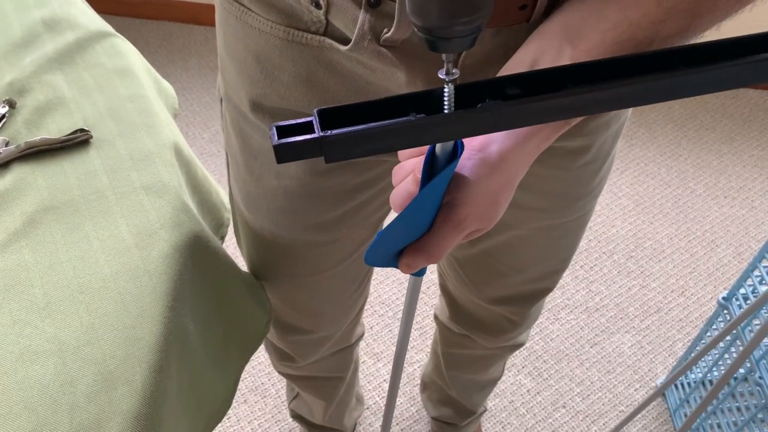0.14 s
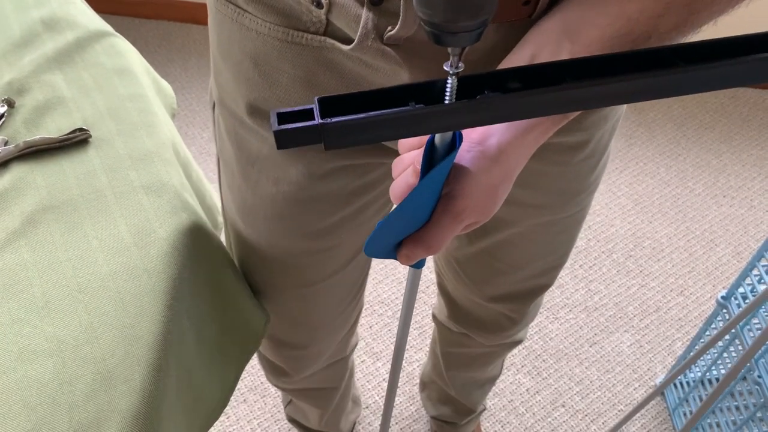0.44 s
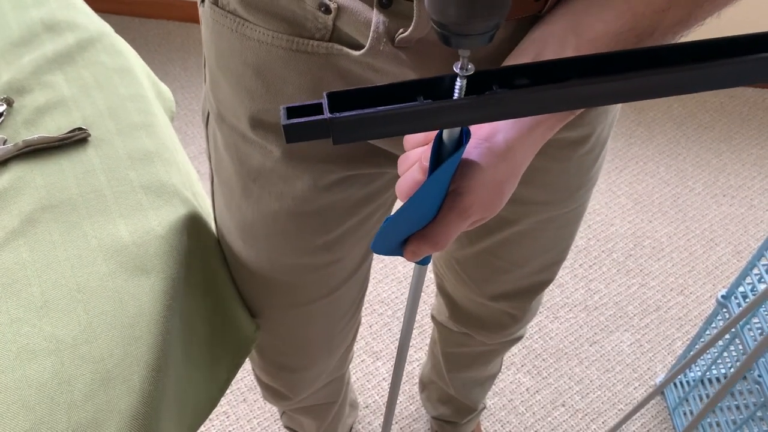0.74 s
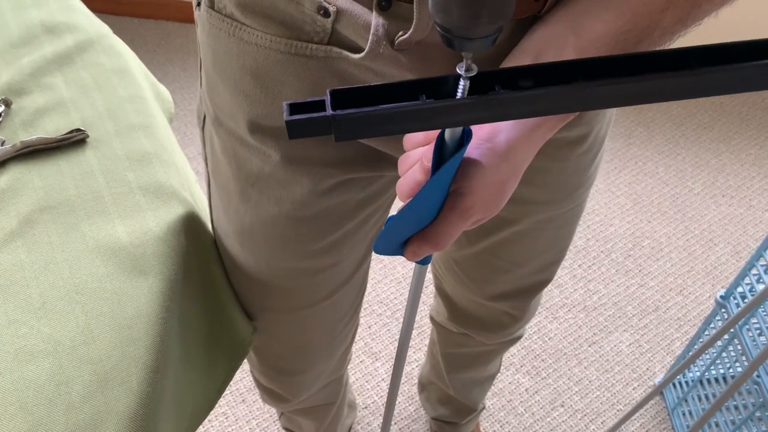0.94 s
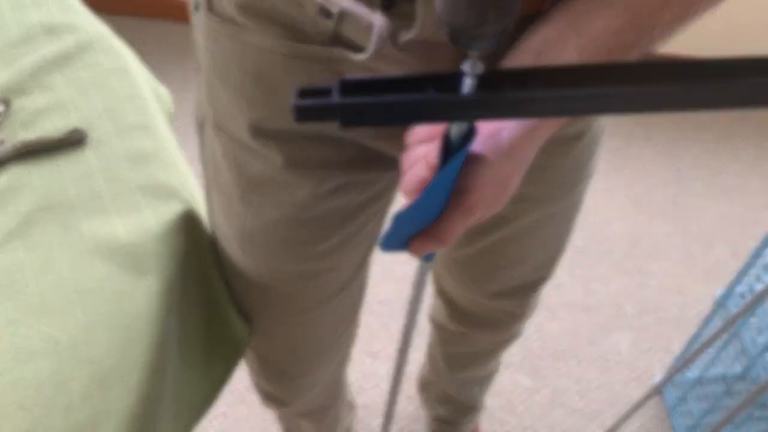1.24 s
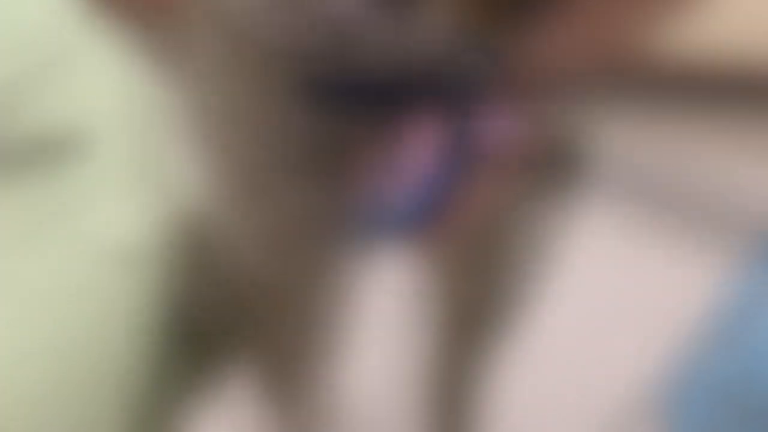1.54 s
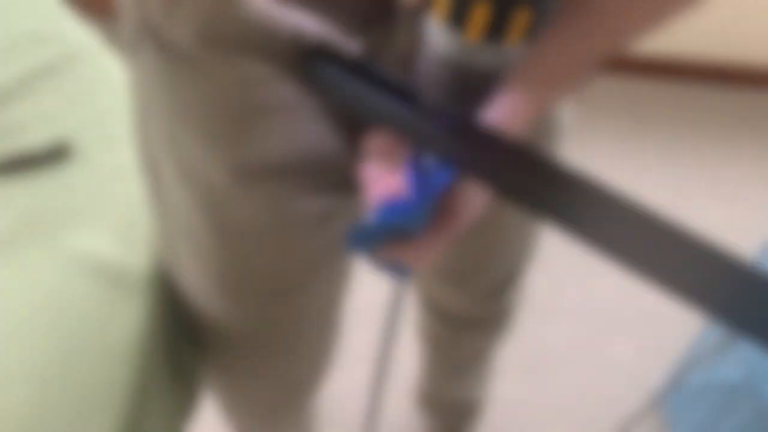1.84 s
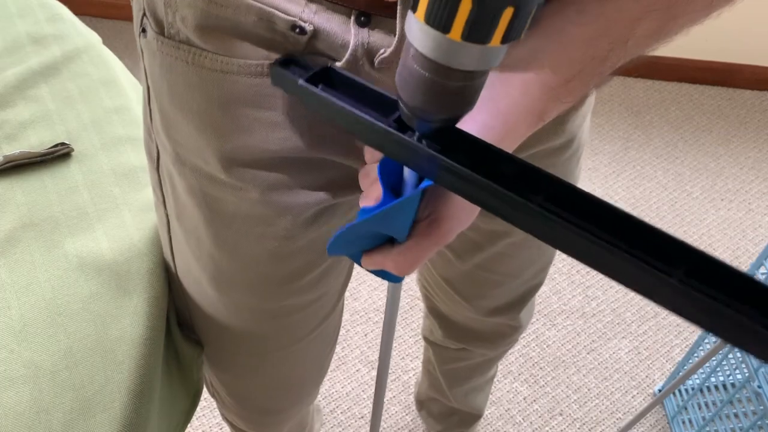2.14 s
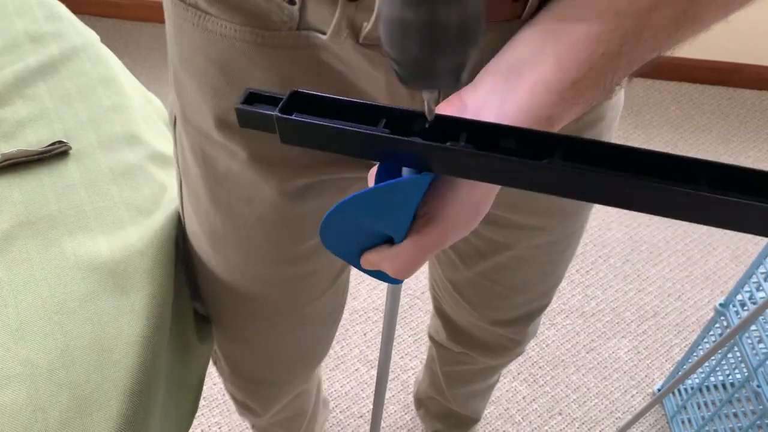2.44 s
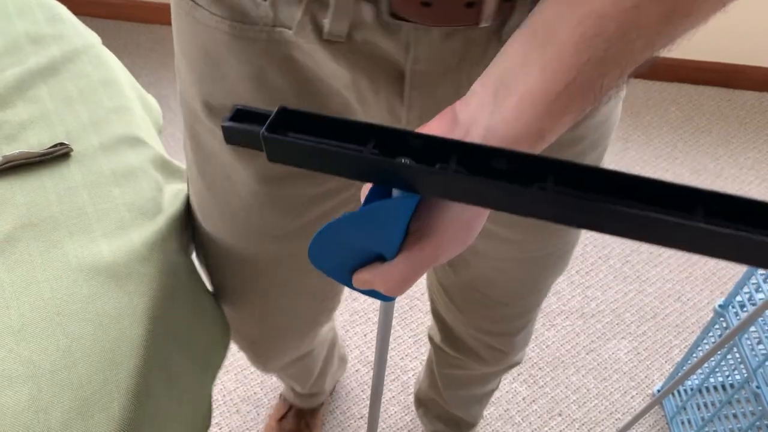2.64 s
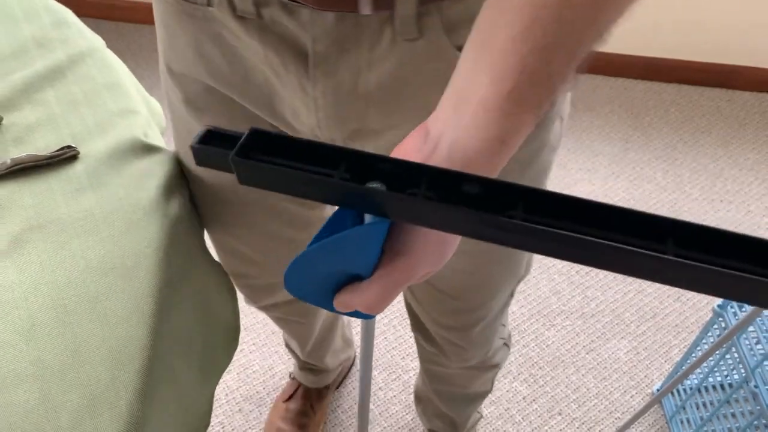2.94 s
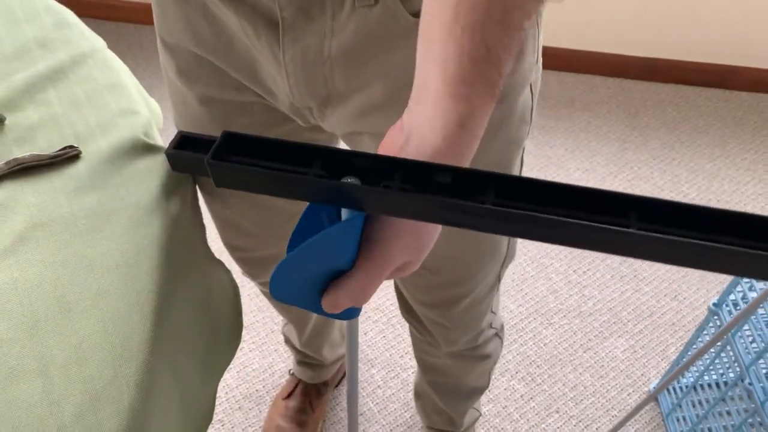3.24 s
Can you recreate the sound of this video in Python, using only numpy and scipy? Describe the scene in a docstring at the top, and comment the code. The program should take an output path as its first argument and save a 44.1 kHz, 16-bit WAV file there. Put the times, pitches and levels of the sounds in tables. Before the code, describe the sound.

A cordless drill whines and rattles, driving a screw into a metal rod, then stops.

```python
"""A cordless drill whines, rattles and revs up, driving a screw into an aluminium rod, close by in a
small carpeted room. Gear teeth and the grinding thread shake the resonances of drill and rod, harder
as the screw seats. The thread squeals, the work thumps and the bit slips twice. The drill stops with
a clack and ticks to rest; a sharp metal click and faint handling follow over a mains hum."""
import sys
import numpy as np
from scipy import signal
from scipy.fft import rfft, irfft
from scipy.io import wavfile
from scipy.ndimage import uniform_filter1d

SR = 44100
rng = np.random.default_rng(int(sys.argv[2]) if len(sys.argv) > 2 else 0)


def master_out(mix):
    """Clip the mix to full scale and print it as 16-bit PCM to the path in sys.argv[1]."""
    frames = np.transpose(np.atleast_2d(mix))
    ceiling = np.clip(frames, -1, 1)
    pcm = np.round(ceiling * 32767).astype(np.int16)
    wavfile.write(sys.argv[1], SR, pcm)


N = 149940
STOP_S = 2.045


def undb(db):
    """Decibels to gain."""
    return 10 ** (np.asarray(db) / 20)


def unit(x):
    """Scale to rms 1."""
    return x / np.sqrt(np.mean(x ** 2) + 1e-20)


def clock():
    """Sample times in seconds."""
    return np.arange(N) / SR


def curve(table, column=1):
    """One table column, interpolated over time."""
    rows = np.array(table)
    return np.interp(clock(), rows[:, 0], rows[:, column])


def smooth(x, window_s):
    """Running mean."""
    return uniform_filter1d(x, max(int(window_s * SR), 1))


def wander(rate_hz):
    """Smooth random drift, rms 1."""
    hold = max(int(SR / rate_hz), 1)
    steps = np.repeat(rng.standard_normal(N // 40)[:N // hold + 1], hold)
    return unit(uniform_filter1d(steps, hold)[:N])


def noise(spectrum):
    """Noise of rms 1, shaped by (freq_hz, level_db) points."""
    hz, db = np.array(spectrum, float).T
    bins_hz = np.maximum(np.fft.rfftfreq(N, 1 / SR), 1)
    gain = undb(np.interp(np.log(bins_hz), np.log(hz), db))
    return unit(irfft(rfft(rng.standard_normal(N)) * gain, N))


def decay(start_s, decay_s):
    """Jump to 1, then exponential fall."""
    age_s = clock() - start_s
    return (age_s >= 0) * np.exp(-np.maximum(age_s, 0) / decay_s)


def strikes(events, decay_s):
    """One decay per (start_s, level_db) row, summed."""
    return sum(undb(db) * decay(start_s, decay_s) for start_s, db in events)


def sine(hz):
    """Tone of rms 1, fixed or moving pitch, random phase."""
    return np.sqrt(2) * np.sin(2 * np.pi * (np.cumsum(hz * np.ones(N)) / SR + rng.random()))


def resonate(x, hz, width_hz):
    """Steep resonance: a band-pass applied twice, scaled to rms 1."""
    b, a = signal.iirpeak(hz, hz / (2 * width_hz), fs=SR)
    return unit(signal.lfilter(b, a, signal.lfilter(b, a, x)))


def db_at_load(load, levels_db):
    """Blend three levels by load: 0 turning lightly, 1 cutting, 2 seating."""
    return np.interp(load, [0, 1, 2], levels_db)


# freq_hz, width_hz, light_db, cutting_db, seating_db
BODY_MODES = [(620, 340, -24, -17.5, -14), (950, 130, -9, -11.5, -10.5), (1363, 226, -4.5, -2.5, -2),
              (1748, 250, -3.5, -6, -3), (2200, 500, -23, -13, -10.5), (2815, 280, -11, -6.5, -3),
              (3350, 490, -2, -2.5, -6), (4594, 670, -13.5, -13.5, -9), (5586, 400, -20, -10.5, -6),
              (6533, 465, -10, -6.5, -3), (7850, 432, -6.5, -5.5, -1.5), (10340, 1930, -22, -19, -12.5),
              (12520, 700, -15, -14, -11.5), (13850, 600, -18, -20, -19), (15100, 360, -16, -9.5, -7.5)]
def rattle(motor_hz, load):
    """Tooth strikes and thread grind shake drill and rod; load shifts the balance of the modes."""
    meshes_per_turn, scatter_db, grind_db, flutter_db = 8, 4, -0.5, 1.11
    turns = np.cumsum(motor_hz) / SR
    teeth = np.diff(np.floor(turns * meshes_per_turn), prepend=0)
    teeth *= undb(scatter_db * rng.standard_normal(N))
    out, power = 0, 0
    for hz, width_hz, *levels_db in BODY_MODES:
        impacts = unit(teeth * rng.standard_normal(N))
        grind = undb(grind_db) * rng.standard_normal(N)
        gain = undb(db_at_load(load, levels_db)) * np.sqrt(width_hz)
        out += gain * resonate(impacts + grind, hz, width_hz) * undb(flutter_db * wander(70))
        power += gain ** 2
    return out / np.sqrt(power)


# motor_multiple, light_db, cutting_db, seating_db (relative to the rattle)
GEAR_ORDERS = [(1, -47, -36, -45.5), (2, -31.5, -23.5, -28.5), (3, -22.5, -26, -30), (4, -19.5, -16, -23),
               (4.04, -27, -13.5, -18.5), (6.95, -25, -22, -14), (7, -27, -19, -34.5),
               (7.93, -22.5, -14.5, -21.5), (8, -10, -9, -17.5), (19, -34, -24.5, -28.5)]
def gear_whine(motor_hz, load):
    """Tones at multiples of the motor speed, roughened by play in the gears."""
    backlash_turns, flutter_db = 0.012, 2
    gear_hz = motor_hz + backlash_turns * SR * np.gradient(wander(350.4))
    return sum(sine(multiple * gear_hz) * undb(db_at_load(load, levels_db) + flutter_db * wander(35))
               for multiple, *levels_db in GEAR_ORDERS)


# freq_hz, width_hz, light_db, cutting_db, seating_db (relative to the rattle)
ROD_MODES = [(831.6, 30, -43, -30.5, -26), (1383, 60, -33, -19.5, -19.5), (5534, 40, -21, -18.5, -19),
             (6730, 60, -30, -19.5, -25), (7810, 90, -17, -15.5, -21), (8010, 53, -13, -31.5, -10.5)]
def rod_ring(load):
    """Grinding keeps the rod's sharp modes ringing."""
    return sum(resonate(rng.standard_normal(N), hz, width_hz) * undb(db_at_load(load, levels_db))
               for hz, width_hz, *levels_db in ROD_MODES)


# time_s, speed_hz
MOTOR_SPEED = [(0, 344), (.14, 350), (.25, 341), (.4, 338), (.48, 356), (.525, 366), (.56, 396), (.6, 417),
               (.68, 413), (.85, 412), (1.1, 412), (1.5, 405), (1.66, 410), (1.78, 403), (1.92, 341),
               (2.04, 372)]
# time_s, level_db, load
DRILL_EFFORT = [(0, -34.5, 0.086), (.49, -34, 0.13), (.56, -30, 0.82), (.99, -28.5, 1.21),
                (1.47, -29, 1.33), (1.6, -27, 2), (1.73, -24, 2.3), (1.77, -29, 2.4), (1.8, -25, 2.35),
                (1.86, -23, 2.7), (1.915, -28, 1.6), (1.95, -21.5, 2.6), (2.03, -33, 1.2)]
def drill():
    """The motor revs as the trigger is squeezed, then sags under load; its level judders."""
    gear_ratio, speed_wobble, ripple_db, judder_db = 30, .0018, 0.07, .5
    load = curve(DRILL_EFFORT, column=2)
    motor_hz = curve(MOTOR_SPEED) * (1 + speed_wobble * wander(40))
    gears = rattle(motor_hz, load) + gear_whine(motor_hz, load)
    chuck_ripple = unit(sum(sine(k * motor_hz / gear_ratio) for k in range(1, 5)))
    running = smooth(undb(curve(DRILL_EFFORT)) * (clock() < STOP_S), window_s=.002)
    return (gears + rod_ring(load)) * running * undb(ripple_db * chuck_ripple + judder_db * wander(130))


# start_s, end_s, start_hz, end_hz, level_db
THREAD_SQUEALS = [(0, 0.313, 3640, 3570, -44), (0, 0.306, 1828, 1803, -48),
                  (0.258, 0.476, 1804, 1960, -44.5), (1.515, 1.77, 2660, 2650, -38),
                  (1.817, 1.907, 2604, 2535, -34)]
def thread_squeal():
    """The thread squeals in short, unsteady glides."""
    t, out = clock(), np.zeros(N)
    for start_s, end_s, start_hz, end_hz, db in THREAD_SQUEALS:
        progress = np.clip((t - start_s) / (end_s - start_s), 0, 1)
        swell = np.sqrt(np.abs(np.sin(np.pi * progress)))
        pitch_hz = (start_hz + (end_hz - start_hz) * progress) * (1 + 0.011 * wander(200))
        out += swell * sine(pitch_hz) * undb(db + 2 * wander(90))
    return out


# start_s, boom_db, shudder_db
JOLTS = [(1.489, -33, -31.5), (1.745, -35.5, -37.5), (1.789, -27.5, -26), (1.92, -25.5, -31.5),
         (1.948, -33.5, -49)]
# freq_hz, level_db
SHUDDER_SPECTRUM = [(20, -15), (50, -10.5), (92, 8), (140, -1.5), (180, 2), (240, -5), (300, -11.5),
                    (355, -5.5), (450, -26.5), (610, -9), (900, -32), (2000, -59)]
def thumps():
    """Each jolt of the work swells a low boom and adds a short shudder."""
    boom_hz, rise_s, soften_s = 63.4, .025, 0.017
    t, boom, shudder = clock(), 0, 0
    for start_s, boom_db, shudder_db in JOLTS:
        rise = (t < start_s + rise_s) * np.maximum(t - start_s, 0) / rise_s
        boom += undb(boom_db) * (rise + decay(start_s + rise_s, decay_s=0.057))
        shudder += undb(shudder_db) * decay(start_s, decay_s=0.061)
    return smooth(boom, soften_s) * sine(boom_hz) + smooth(shudder, soften_s) * noise(SHUDDER_SPECTRUM)


# start_s, level_db
BIT_SLIPS = [(1.775, -10.5), (1.926, -8)]
BIT_CATCHES = [(1.7885, -17), (1.793, -18), (1.9425, -16)]
# freq_hz, level_db
KNOCK_SPECTRUM = [(100, -17), (600, -7), (1400, -1.5), (2100, -5), (2900, -1.5), (4500, -18), (8000, -16.5),
                  (15000, -26)]
CATCH_SPECTRUM = [(500, -10.5), (1500, 0.5), (4000, -8), (6200, 0), (8500, -10.5), (10500, -0.5),
                  (13000, -14.5), (15500, -5.5)]
def bit_slips():
    """The bit jumps out of the screw head with a hard knock, then catches again."""
    hold_s, knocks = .0022, 0
    for start_s, db in BIT_SLIPS:
        held = decay(start_s, decay_s=1) * (clock() < start_s + hold_s)
        knocks += undb(db) * (held + decay(start_s + hold_s, decay_s=0.0016))
    return noise(KNOCK_SPECTRUM) * knocks + noise(CATCH_SPECTRUM) * strikes(BIT_CATCHES, decay_s=.003)


# start_s, level_db
CHUCK_TICKS = [(2.06, -32), (2.089, -49), (2.1065, -47), (2.1245, -47), (2.1432, -39.5), (2.162, -48),
               (2.1805, -46.5), (2.197, -62), (2.214, -54)]
# freq_hz, level_db
CHUCK_SPECTRUM = [(200, -13.5), (1300, 4), (2500, 1), (4500, -5), (6200, -3), (7500, -7.5), (7950, 12.5),
                  (8600, -18), (11000, -13), (13000, -2), (14200, -10), (15200, -5)]
CLACK_SPECTRUM = [(300, -27), (1400, 1.5), (2500, -1.5), (4000, 0.5), (5500, -4.5), (8000, -3.5),
                  (10000, -15), (15000, -4.5)]
def chuck_stop():
    """The chuck brakes with a clack, then whirs and ticks to rest."""
    clack_db, whir_db, fall_db_per_s = -17, -64, 107
    whir = undb(whir_db) * decay(STOP_S, decay_s=20 / np.log(10) / fall_db_per_s)
    run_down = noise(CHUCK_SPECTRUM) * (whir + strikes(CHUCK_TICKS, decay_s=.003))
    clack = noise(CLACK_SPECTRUM) * undb(clack_db) * decay(start_s=2.0404, decay_s=0.003)
    return clack + run_down


# start_s, snap_db, ring_db
METAL_CLICKS = [(2.2716, -26, -46.5), (2.283, -42, -64), (2.7906, -56, -78), (3.1595, -57.5, -84)]
# freq_hz, level_db
SNAP_SPECTRUM = [(200, -19), (600, -8.5), (1100, -7.5), (2100, -17), (2700, -8), (3350, 4), (4200, -13),
                 (4900, 3.5), (6000, -10), (7500, -15), (11000, -18), (15000, -23)]
# freq_hz, width_hz, level_db
METAL_MODES = [(1110, 390, -1), (1833, 260, -10), (3020, 84, -6), (3470, 200, 2), (5170, 530, 2.5),
               (6450, 400, -1), (11080, 1800, -12)]
def metal_clicks():
    """Metal touches metal: a snap and a short diffuse ring."""
    snaps = [(start_s, db) for start_s, db, _ in METAL_CLICKS]
    rings = [(start_s, db) for start_s, _, db in METAL_CLICKS]
    snap = noise(SNAP_SPECTRUM) * strikes(snaps, decay_s=.0014)
    metal = sum(undb(db) * resonate(rng.standard_normal(N), hz, width_hz)
                for hz, width_hz, db in METAL_MODES)
    return snap + unit(metal) * strikes(rings, decay_s=0.031)


# start_s, level_db
LIFT_TAPS = [(2.341, -61), (2.5085, -57), (2.5232, -49), (2.5423, -48.5), (2.614, -64)]
# freq_hz, level_db
TAP_SPECTRUM = [(300, -8), (900, -7), (1700, 2), (2200, -9), (2850, 5.5), (3500, -13), (7800, -14.5),
                (15000, -14)]
def lift_taps():
    """Soft, dull taps as the drill lifts off."""
    return noise(TAP_SPECTRUM) * strikes(LIFT_TAPS, decay_s=0.0046)


# time_s, level_db
RUSTLE_LEVEL = [(2.1, -55), (2.3, -67.5), (2.42, -68), (2.53, -69.5), (2.62, -62.5), (2.72, -70),
                (2.87, -68), (3.05, -73.5), (3.4, -83)]
# freq_hz, level_db
CLOTH_SPECTRUM = [(240, -23), (400, -8.5), (419, -11.5), (452, -3.5), (994, 0), (1170, -2), (3010, -7.5),
                  (15000, -24.5)]
def rustle():
    """Hands and clothes rub faintly."""
    return noise(CLOTH_SPECTRUM) * undb(curve(RUSTLE_LEVEL) + 1.5 * wander(60))


# freq_hz, level_db
MAINS_PARTIALS = [(119.7, -51), (239.4, -65), (359, -80)]
AIR_SPECTRUM = [(180, -16.5), (300, 0), (714, -13), (975, -14.5), (1170, -19.5), (1470, -14.5),
                (3270, -17.5), (15000, -37.5)]
RUMBLE_SPECTRUM = [(20, -11.5), (30, -2.5), (45, -7.5), (65, -1), (95, -9.5), (150, -11), (220, -14),
                   (400, -20), (1000, -54)]
def background():
    """Mains hum, still air and low rumble."""
    air_db, rumble_db = -69.5, -57.5
    hum = sum(sine(hz) * undb(db + .4 * wander(6.8)) for hz, db in MAINS_PARTIALS)
    return hum + noise(AIR_SPECTRUM) * undb(air_db) + noise(RUMBLE_SPECTRUM) * undb(rumble_db)


def room(x):
    """Add the short, dark tail of a carpeted room."""
    gap_s, t60_s, tail_db = 0.0013, 0.41, -15
    reflections = noise([(100, 12.5), (1000, 1.5), (5000, -0.5), (15000, -5)])
    tail = (reflections * decay(gap_s, t60_s / np.log(1000)))[:SR // 2]
    tail /= np.sqrt(np.sum(tail ** 2))
    return x + undb(tail_db) * signal.fftconvolve(x, tail)[:N]


def scene():
    """All sources straight ahead, the same in both channels."""
    machine = room(drill() + thread_squeal() + chuck_stop())
    mono = machine + bit_slips() + metal_clicks() + lift_taps() + thumps() + rustle() + background()
    return np.array([mono, mono])


def record(dry):
    """A fast limiter ducks the hardest knocks; a steep low-pass cuts the top."""
    limit_db, release_s, cutoff_hz = -9.5, .007, 15800
    overshoot = np.log(np.maximum(np.abs(dry[0]) / undb(limit_db), 1))
    fall = clock() / release_s
    # peak hold with exponential release
    reduction = np.exp(np.maximum.accumulate(np.log(overshoot + 1e-12) + fall) - fall)
    limited = dry * np.exp(-smooth(reduction, window_s=0.00054))
    return signal.sosfilt(signal.ellip(10, .2, 80, cutoff_hz, fs=SR, output="sos"), limited)


dry = scene()
out = record(dry)
master_out(out)
```